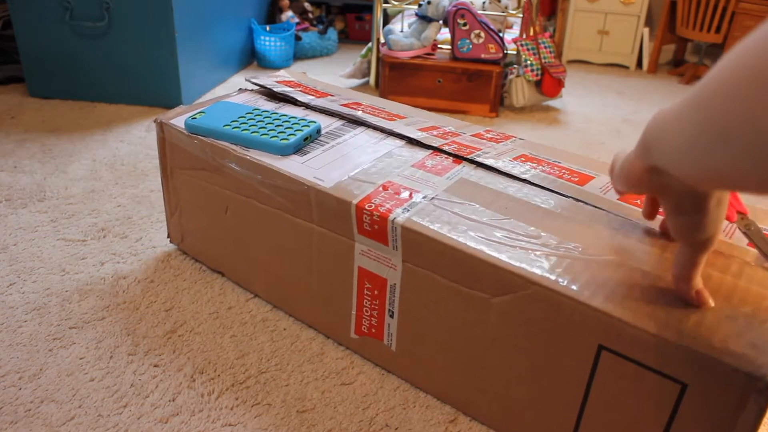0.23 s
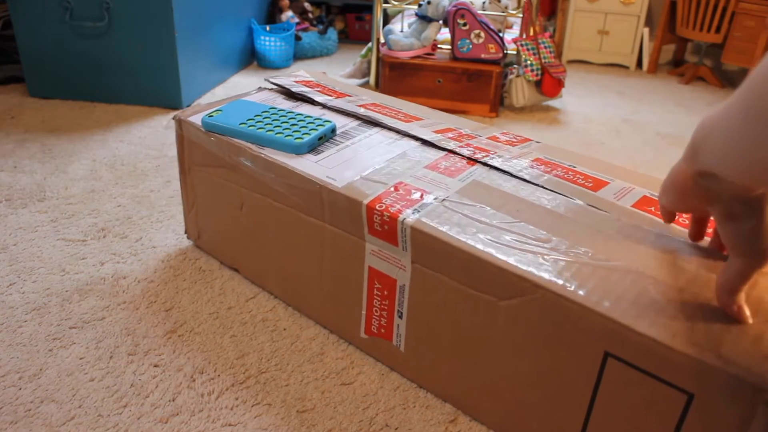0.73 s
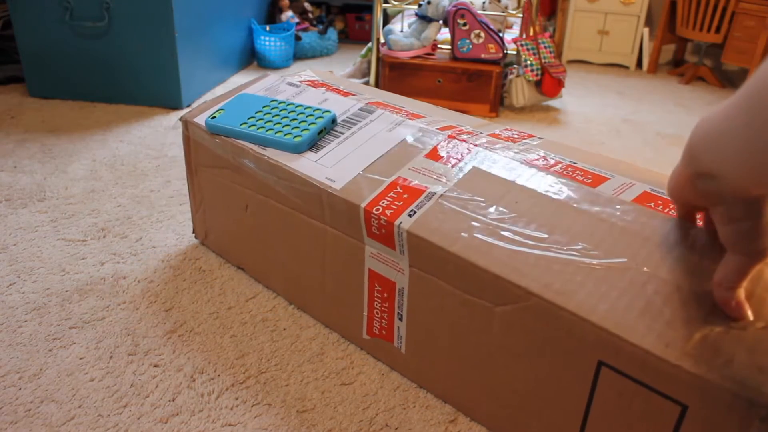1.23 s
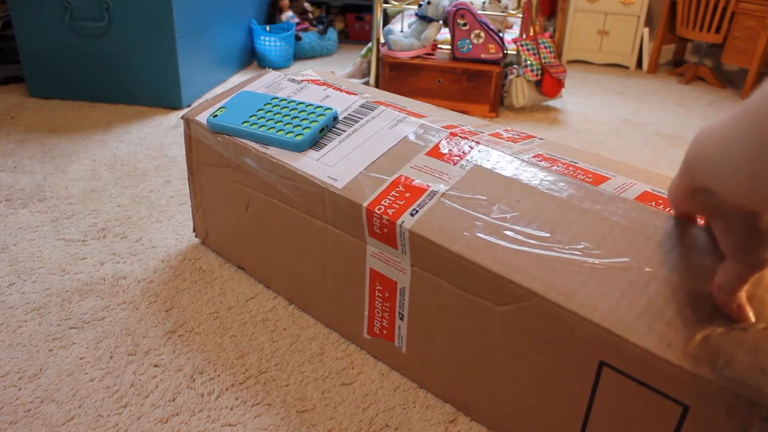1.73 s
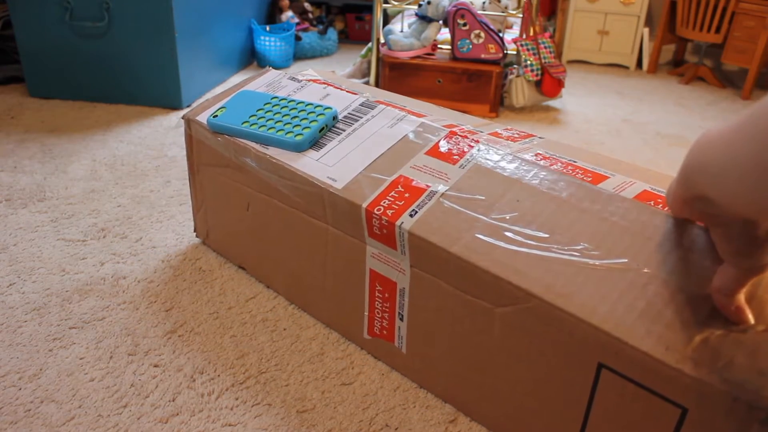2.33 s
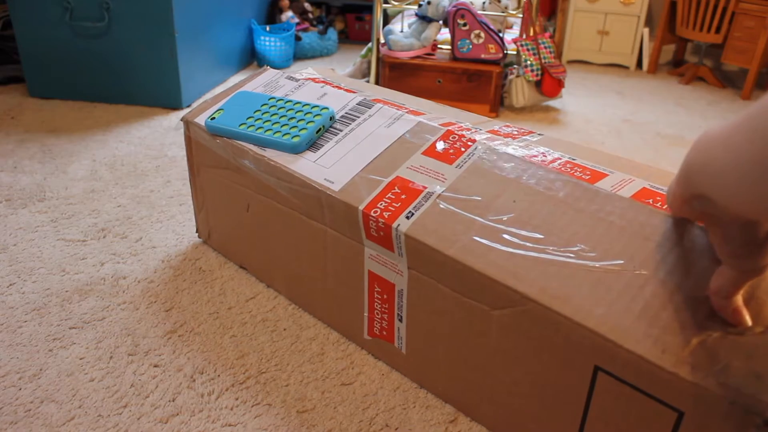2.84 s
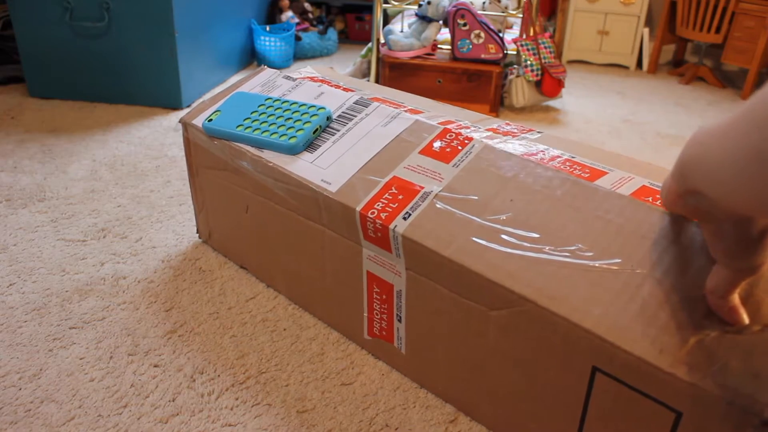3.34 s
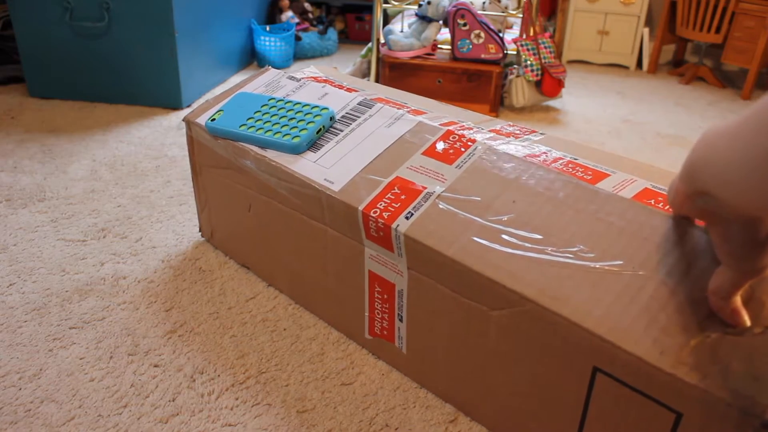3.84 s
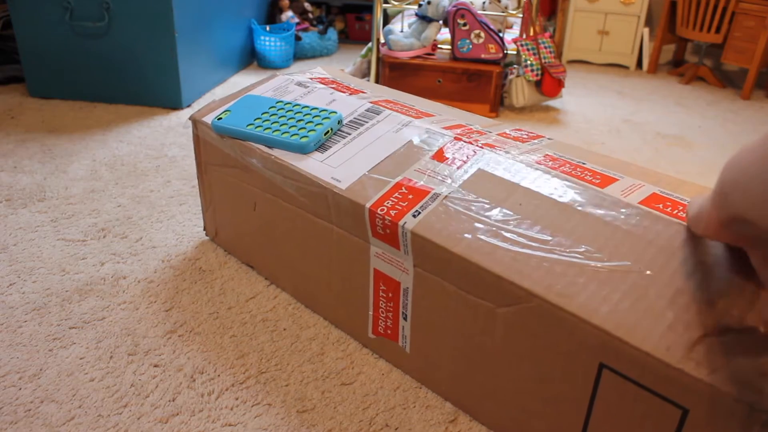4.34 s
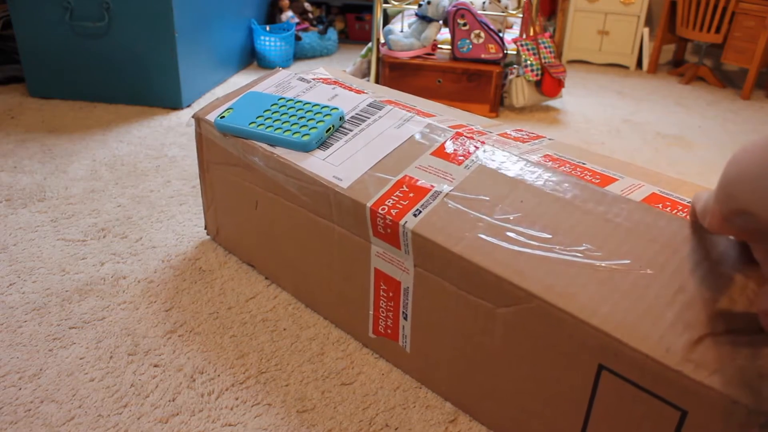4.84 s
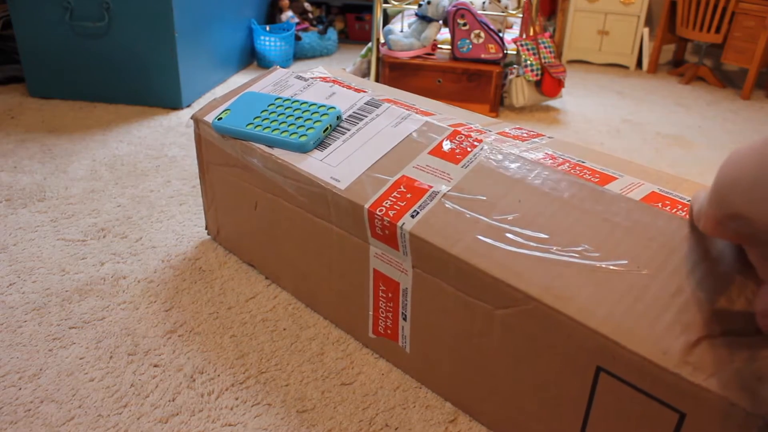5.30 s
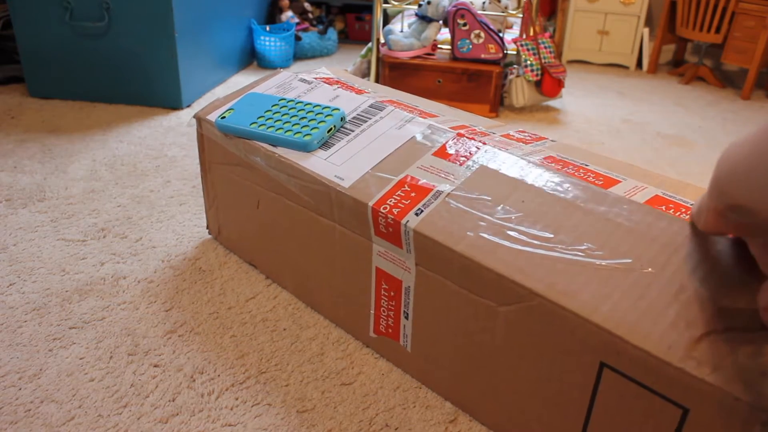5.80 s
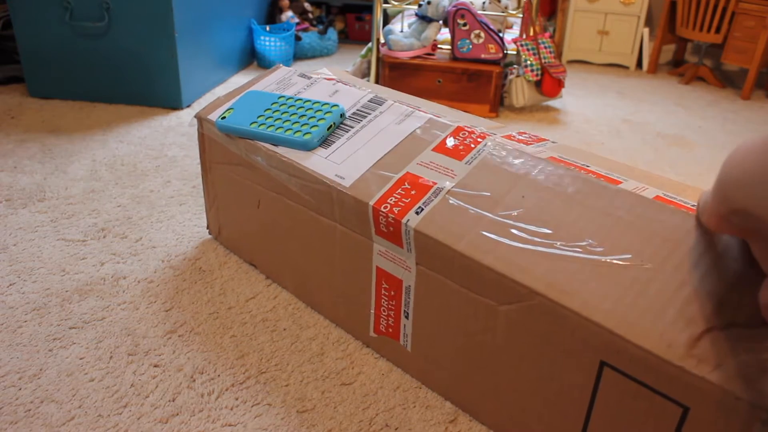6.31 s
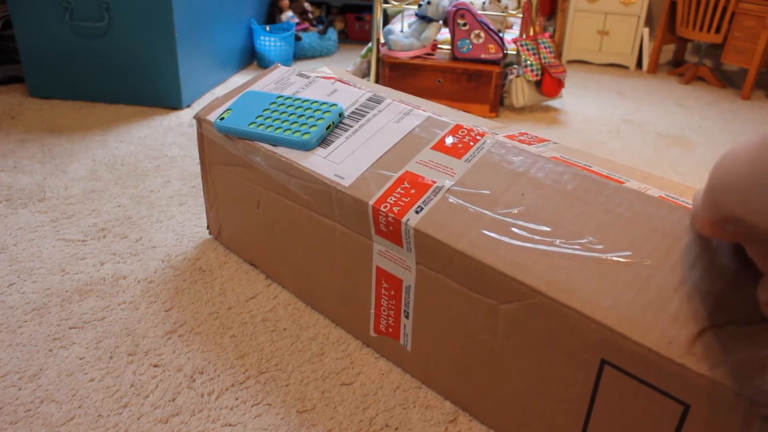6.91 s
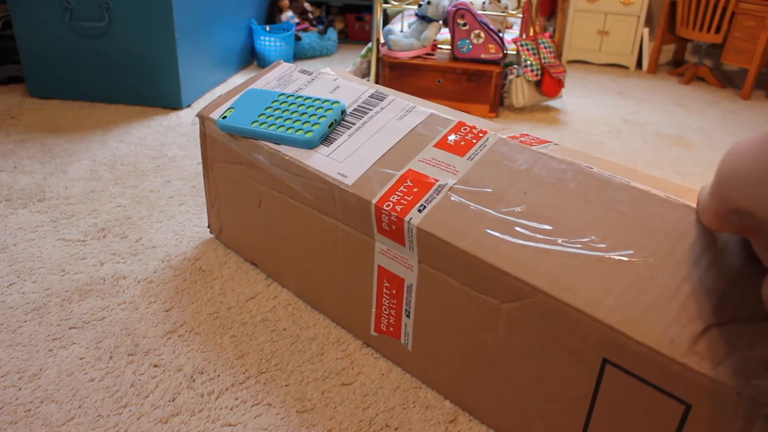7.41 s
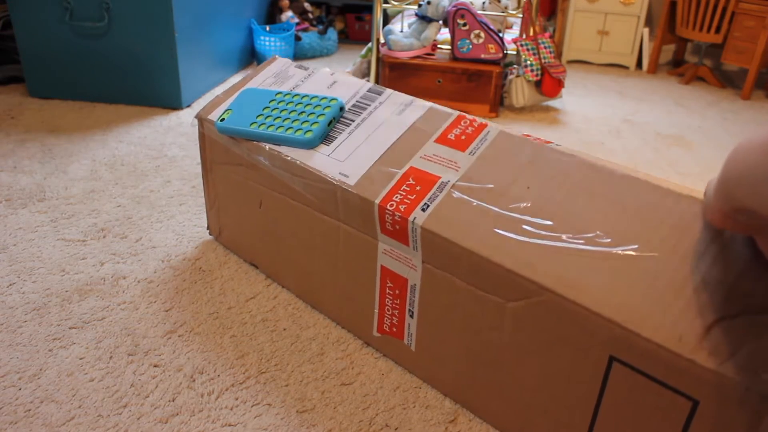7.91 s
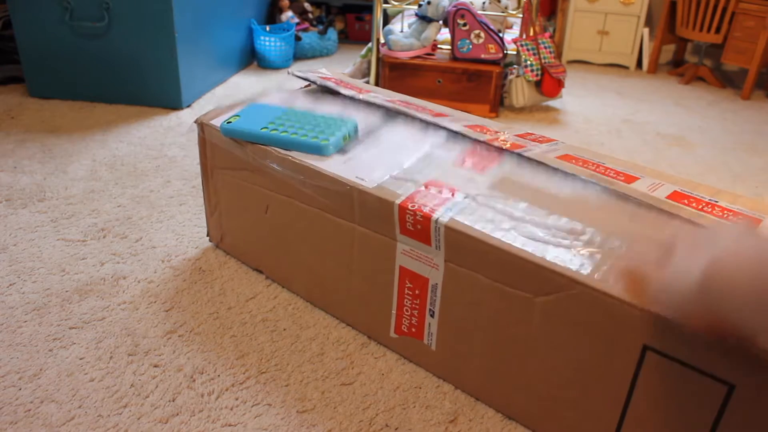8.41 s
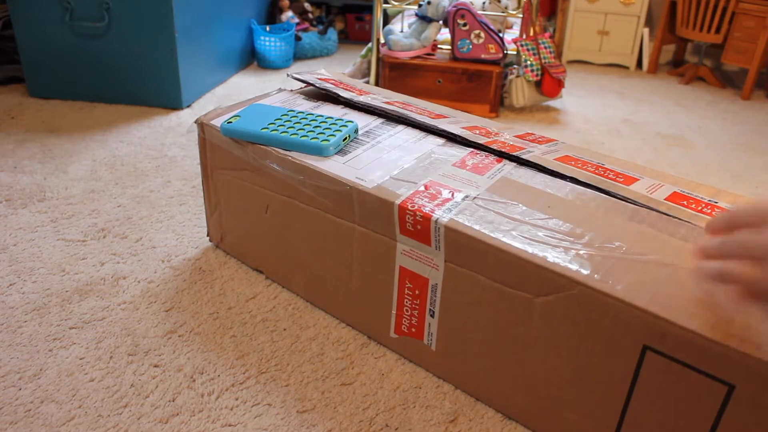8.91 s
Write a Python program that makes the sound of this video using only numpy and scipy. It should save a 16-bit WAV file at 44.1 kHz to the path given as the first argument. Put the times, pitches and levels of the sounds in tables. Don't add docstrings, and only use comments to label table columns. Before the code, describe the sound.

Hands work at a taped cardboard box close to a small microphone in a quiet carpeted room. Loud tape snaps, crinkles and hollow knocks crowd the first second or so, then softer rubbing, low thumps and little creaks follow with pauses. Tape crackles pick up again later, ending in scraping flaps and quieter handling. Faint hiss, hum and a distant bird lie behind.

```python
import sys
import numpy as np
from scipy import signal
from scipy.fft import rfft, irfft, next_fast_len
from scipy.io import wavfile
from scipy.ndimage import uniform_filter1d

SR = 44100
rng = np.random.default_rng(int(sys.argv[2]) if len(sys.argv) > 2 else 0)


def volts(x):
    e = np.asarray(x, float) / 20
    return 10 ** e


def wav_out(sig):
    wavfile.write(sys.argv[1], SR, np.round(np.clip(np.atleast_2d(sig).T, -1, 1) * 32767).astype(np.int16))


N = 403515

# (frequency [Hz], width [Hz], gain [dB])
BOX = [(225, 58, 2.5), (428, 261, 0.5), (559.6, 190, 3.5), (771, 348, -3), (1100, 610, -10)]
# (frequency [Hz], width [Hz], gain [dB])
FLAP = [(987, 310, 2.5), (1364, 440, 5), (1816, 530, 4.5), (2416, 356, 1.5), (2970, 560, -8)]
# (frequency [Hz], width [Hz], gain [dB])
SWAY = [(85, 38, -1), (123, 75, 1.5), (179, 58, 1.5)]


def evened(x):
    return x / np.sqrt(np.mean(x ** 2) + 1e-20)


def read(points, hz):
    f, value = np.transpose(points)
    return np.interp(np.log(hz + 1), np.log(f + 1), value)


def add(mix, s, sound):
    part = mix[round(s * SR):][:len(sound)]
    part += sound[:len(part)]


def colour(x, points):
    size = next_fast_len(len(x))
    gain = volts(read(points, np.fft.rfftfreq(size, 1 / SR)))
    return irfft(rfft(x, size) * gain, size)[:len(x)]


def ring(x, modes):
    out = np.zeros(len(x))
    for k, (hz, width, db) in enumerate(modes):
        b, a = signal.iirpeak(hz, hz / min(width, SR / 5), SR)
        out += (-1) ** k * volts(db) * signal.lfilter(b, a, x)
    return out


def slips(per_s, spread_db, clump_db, clump_s, smooth):
    drift = uniform_filter1d(rng.standard_normal(N), max(int(clump_s * SR), 2))
    clumps = volts(clump_db * evened(drift))
    when, size, noise = rng.random(N), rng.exponential(1, N), rng.standard_normal((2, N))
    grains = (when < per_s / SR) * volts(spread_db * np.minimum(size, 3.6)) * np.sign(noise[0])
    return clumps * (evened(grains) + smooth * noise[1])


def quiet():
    # (frequency [Hz], level [dB per Hz])
    hiss_spectrum = [(18, -36), (30, -6), (65, -1.5), (112, -2.5), (167, -9), (378, -13.5), (420, -17),
                     (1380, -27), (2600, -19.5), (3130, -26), (3480, -23), (15800, -29.5), (16100, -58)]
    hiss_db = -58.5
    hum_hz, hum_db = 118.4, -70
    hum = np.sqrt(2) * volts(hum_db) * np.sin(2 * np.pi * hum_hz * np.arange(N) / SR)
    return volts(hiss_db) * evened(colour(rng.standard_normal(N), hiss_spectrum)) + hum


def bird():
    # (time [s], length [s], start pitch [Hz], end pitch [Hz], level [dB])
    bird_notes = [
        (1.355, 0.1, 2680, 2620, -70.5),
        (1.495, 0.059, 2660, 2660, -65),
        (2.755, 0.097, 2680, 2640, -61),
        (4.43, 0.066, 2660, 2620, -61),
        (5.32, 0.063, 2680, 2660, -62),
        (6.06, .11, 2680, 2650, -64),
        (6.175, 0.056, 2690, 2660, -61),
        (8.763, 0.067, 3240, 2900, -65),
    ]
    out = np.zeros(N)
    for s, length, start_hz, end_hz, db in bird_notes:
        hz = np.linspace(start_hz, end_hz, int(length * SR))
        hz = hz + 18 * evened(uniform_filter1d(rng.standard_normal(len(hz)), size=150))
        whistle = np.sin(2 * np.pi * np.cumsum(hz) / SR)
        add(out, s, 2 * volts(db) * whistle * np.hanning(len(hz)) ** 0.82)
    return out


def room(x):
    # (frequency [Hz], time to fall 60 dB [s])
    decay_times = [(150, 0.17), (500, 0.21), (2500, 0.22), (9000, 0.17)]
    taps = np.zeros(SR // 2)
    at = np.arange(160, SR // 2 - 20, 20)
    taps[at + rng.integers(0, 20, len(at))] = rng.choice([-1., 1.], len(at))
    hz, t, z = signal.stft(taps, SR, nperseg=256)
    fall = volts(-60 * t / read(decay_times, hz)[:, None])
    tail = signal.istft(z * fall, SR, nperseg=256)[1]
    return signal.fftconvolve(x, tail / np.linalg.norm(tail))[:N]


def heaves():
    # (time [s], length [s], level [dB])
    leans = [(0.364, 0.076, -38), (0.573, 0.059, -53), (0.69, 0.027, -51), (0.76, 0.14, -52),
             (0.923, 0.067, -47), (1.049, 0.039, -37), (1.093, 0.043, -42), (1.483, 0.035, -42.5),
             (1.7, 0.11, -38), (2.048, 0.047, -43), (2.18, 0.027, -44), (2.43, 0.16, -38.5),
             (3.083, 0.041, -42), (3.125, 0.059, -38), (3.2, 0.032, -44), (3.484, 0.094, -38.5),
             (4.03, 0.031, -41), (4.573, 0.059, -51), (4.777, 0.11, -39), (4.943, 0.064, -47),
             (5.176, 0.029, -44), (5.224, 0.047, -37), (5.345, 0.076, -47), (5.613, 0.056, -47),
             (5.694, 0.097, -40.5), (5.825, 0.073, -49), (5.946, 0.12, -42), (6.254, 0.047, -45),
             (6.946, 0.05, -53), (7.064, 0.046, -40), (7.134, 0.15, -38), (7.574, 0.085, -41),
             (7.637, 0.087, -39), (8.238, 0.031, -55), (8.334, 0.052, -34), (8.442, 0.039, -48),
             (8.987, 0.027, -52), (9.102, 0.067, -41)]
    out = np.zeros(N)
    sway = ring(ring(rng.standard_normal(N + SR), SWAY), [(127, 180, 0)])
    for s, length, db in leans:
        u = np.arange(0, 1.1 * length, 1 / SR) / (1.1 * length)
        swell = np.sin(np.pi * u ** 0.67) ** 1.6
        add(out, s, volts(db - 4.8) * evened(swell * sway[round(s * SR):][:len(u)]))
    return out


def knocks():
    # (time [s], peak level [dB])
    lid_taps = [(0.0543, -21), (.098, -26), (0.2237, -28), (0.3225, -25.5), (0.3929, 1), (0.563, -19.5),
                (0.659, -21.5), (0.7583, -25), (0.7744, -17), (.828, -6), (0.929, -17), (0.9633, -18.5),
                (0.9779, -18.5), (1.055, -35), (1.107, -25.5), (1.174, -36), (1.222, -39), (2.055, -33.5),
                (2.131, -36), (2.405, -45), (2.792, -42), (4.0351, -22.5), (4.171, -27.5), (5.508, -27),
                (5.7608, -18.5), (6.0352, -24), (6.595, -33.5), (7.273, -17), (8.2435, -22), (8.999, -27)]
    # (time [s], peak level [dB], panel pitch [Hz])
    wall_pushes = [(0.4008, -11.5, 248), (0.6211, -19.5, 275), (2.956, -23, 388), (3.1476, -27, 248),
                   (3.2922, -28.5, 330), (3.5203, -21.5, 226), (1.49, -34, 200), (4.564, -38, 302),
                   (4.837, -23.5, 230), (5.236, -29, 200), (5.6, -35, 276), (5.624, -28, 250),
                   (8.45, -31, 274), (9.034, -31, 370), (4.617, -27, 330), (4.943, -33, 177),
                   (5.3598, -30.5, 266), (5.725, -18, 285), (5.739, -18.5, 250), (5.8523, -23, 357),
                   (5.86, -22, 330), (5.9742, -19.5, 281), (6.2536, -25.5, 272), (6.367, -32.5, 280),
                   (6.964, -22.5, 245), (7.0837, -21.5, 265), (7.238, -17.5, 318), (7.584, -27, 231),
                   (7.6032, -23.5, 362), (7.6718, -20.5, 233), (8.2343, -20.5, 349), (8.362, -21.5, 206)]
    lid_hz = 479
    out, t = np.zeros(N), np.arange(4000) / SR
    rows = [r + (lid_hz,) for r in lid_taps] + wall_pushes
    for (s, db, hz), noise in zip(rows, rng.standard_normal((len(rows), 4000))):
        panel = np.sin(2 * np.pi * hz * t) * np.exp(-t * hz / 0.86)
        push = noise * np.exp(-t / 0.0023)
        hollow = ring(ring(push, [(330, 3500, 0)]), BOX)
        sound = ring(panel, [(hz, 3.3 * hz, 3)]) / abs(panel).max() + 0.78 * hollow / abs(hollow).max()
        add(out, s, volts(db - 0.5) * sound / abs(sound).max())
    return out


def rubs():
    # (time [s], length [s], pitch [Hz], level [dB])
    rubbed_patches = [(0.0, 0.037, 2320, -51), (.225, 0.041, 9500, -46), (1.758, 0.051, 1000, -49),
                      (3.46, 0.067, 2090, -51), (3.461, 0.035, 1300, -53), (4.37, 0.2, 2150, -60),
                      (4.617, .04, 3700, -58), (4.947, 0.058, 5170, -58), (5.189, .085, 8400, -55),
                      (5.19, .085, 6000, -56), (5.191, 0.081, 3700, -54.5), (2.02, .07, 1700, -51.5),
                      (3.603, .05, 1490, -55), (0.781, 0.038, 3970, -44), (5.349, 0.042, 5300, -56),
                      (5.505, 0.022, 3650, -47.5), (5.68, 0.032, 4000, -56), (5.723, .05, 5300, -52.5),
                      (5.977, 0.045, 3630, -50), (6.247, 0.04, 1670, -49), (6.273, 0.12, 2970, -52.5),
                      (6.65, 0.035, 2900, -54), (6.698, .05, 3200, -45), (0.964, 0.057, 3000, -38),
                      (1.301, 0.084, 563, -51), (4.257, 0.13, 300, -58), (6.353, 0.053, 269, -44.5),
                      (9.004, 0.037, 1500, -53), (7.146, .03, 5000, -39), (7.261, 0.03, 7000, -36.5),
                      (7.258, 0.046, 11700, -37), (8.539, 0.045, 4760, -61)]
    out, grit = np.zeros(N), slips(2500, 2.5, 3.4, 0.01, 0.31)
    for s, length, hz, db in rubbed_patches:
        part = grit[round(s * SR):][:int(length * SR)]
        band = [(hz, 0.16 * hz, 0)]
        song = ring(ring(part, band), band)
        add(out, s, volts(db) * evened(song * np.hanning(len(part)) ** 0.6))
    return out


def pops():
    # (time [s], peak level [dB], pitch [Hz])
    crease_pops = [(0.206, -39, 6000), (.371, -26, 11500), (.419, -25, 3700), (.448, -29, 11000),
                   (2.13, -36, 1500), (3.40, -40, 1810), (3.415, -44, 1800), (3.871, -40, 1900),
                   (4.15, -41, 1500), (4.135, -31, 1100), (4.51, -40, 1200), (4.7, -42, 1510),
                   (4.833, -35, 2210), (3.983, -42, 700), (3.7785, -49.5, 3720), (3.8093, -35.5, 3600),
                   (3.824, -42, 3500), (4.289, -37, 4500), (4.93, -34, 1700), (5.157, -44, 5000),
                   (5.175, -40, 5000), (5.312, -43, 5000), (5.538, -34, 2200), (5.555, -41, 9000),
                   (5.673, -35, 3500), (5.891, -31, 3600), (6.007, -35, 5200), (6.029, -25, 5000),
                   (6.573, -37, 9500), (7.558, -34, 11000), (7.572, -39, 8000), (7.892, -43, 6900),
                   (7.919, -40, 3500), (4.674, -31, 5900), (7.666, -20, 8400), (5.633, -30, 3300),
                   (1.331, -31.5, 3030), (2.572, -35, 1700)]
    out, t = np.zeros(N), np.arange(900) / SR
    for (s, db, hz), noise in zip(crease_pops, rng.standard_normal((len(crease_pops), 900))):
        band = [(hz, 0.5 * hz, 0)]
        tick = (t == 0) + 0.13 * noise * np.exp(-t / .003)
        pop = ring(ring(tick, band), band)
        add(out, s, volts(db) * pop / abs(pop).max())
    return out


def rumble():
    contact = ring(slips(600, 1.5, 2.94, 0.017, 0.83), [(402, 720, 0)])
    rocking = ring(slips(100, 1.7, 9.0, 0.025, 0.73), SWAY)
    return evened(ring(contact, BOX)) + volts(-6.0) * evened(rocking)


def creases(low_hz, high_hz, width, count=6):
    out = np.zeros(N)
    for hz in np.geomspace(low_hz, high_hz, count):
        out += ring(slips(500, 2.15, 3.6, .025, 0.75), [(hz, width * hz, 0)]) / np.sqrt(hz)
    return out


def crackle(count=6):
    out = np.zeros(N)
    for hz in np.geomspace(1100, 8000, count):
        ticks = (rng.random(N) < 45 / SR) * volts(3.5 * np.minimum(rng.exponential(1, N), 4))
        out += evened(ring(ticks, [(hz, 0.15 * hz, 0)]))
    return evened(out)


def contact_layers():
    # (frequency [Hz], level [dB per Hz])
    film_spectrum = [(1470, -20.5), (2500, -0.5), (3430, -4), (4890, -3.5), (5550, -4), (12000, -4),
                     (15800, -6), (16100, -40)]
    judder = volts(2.0 * evened(uniform_filter1d(rng.standard_normal(N), 500)))
    low = rumble()
    scrape = evened(judder * ring(creases(800, 3000, 0.88), FLAP))
    crinkle = evened(judder * colour(creases(3000, 15000, 0.59), film_spectrum))
    return low, scrape, crinkle + volts(-10) * crackle()


def grip(low, scrape, crinkle):
    # (time [s], effort [dB], share of tape under the fingers [dB])
    hand_course = [(0.0, -41, -10), (0.3, -55, 6), (0.84, -49.5, -9), (1.3, -54.5, -1.5),
                   (2.93, -58.5, -2.5), (3.31, -50, 0), (3.87, -60.5, 0.5), (4.05, -46.5, -1.5),
                   (4.56, -47.5, -3.5), (5.22, -68, 8.5), (5.63, -43.5, -5), (6.039, -56.5, 2),
                   (6.499, -58, 1.5), (7.11, -54.5, 1.5), (7.95, -58, 3.5), (8.33, -38.5, -3),
                   (8.538, -59.5, -0.5), (9.098, -59, -5)]
    s, *courses = np.transpose(hand_course)
    effort_db, tape_db = (np.interp(np.arange(N) / SR, s, db) for db in courses)
    scrape_db = -3.2 + 0.69 * tape_db
    return volts(effort_db - 4.5) * (low + volts(scrape_db) * scrape + volts(tape_db) * crinkle)


def strokes(low, scrape, crinkle):
    # (time [s], length [s], rumble [dB], crinkle over rumble [dB])
    shove_strokes = [(0., 0.0075, -33, -23), (.056, 0.019, -39.5, -6.5), (.386, 0.013, -19.5, -9),
                     (.41, 0.015, -35, -19.5), (.558, 0.063, -35.5, -6), (.819, 0.062, -36, -1.5),
                     (1.47, 0.024, -48, -8), (1.738, .085, -43, -8.5), (2.015, 0.096, -40, -13),
                     (2.118, 0.026, -44.5, -10), (2.442, 0.067, -32.5, -7), (2.938, 0.055, -47, -23),
                     (3.075, 0.1, -30.5, -11.5), (3.279, 0.014, -53, 1), (3.591, 0.055, -40, -10),
                     (4.023, 0.023, -32.5, -9.5), (4.53, 0.037, -41.5, -18), (4.77, 0.083, -38, -12),
                     (4.915, 0.087, -41, -15.5), (5.046, 0.036, -48.5, -34), (5.723, 0.042, -27.5, -12.5),
                     (5.837, 0.043, -46.5, 5.5), (6.412, 0.073, -47, -11.5), (6.786, 0.077, -39.5, -9),
                     (6.947, 0.04, -33.5, -12), (7.18, 0.048, -33, -18), (9.11, 0.043, -40, -10)]
    # (time [s], length [s], rumble [dB], crinkle over rumble [dB])
    slide_strokes = [(.653, 0.073, -42, 1), (.99, 0.073, -48, 4), (2.18, 0.031, -47.5, -3.5),
                     (2.239, 0.024, -50.5, -0.5), (2.554, 0.06, -42, -3), (2.656, 0.051, -56, 7.5),
                     (2.841, 0.063, -64.5, 7.5), (3.19, 0.036, -49, 0), (3.45, 0.082, -45, -1),
                     (4.111, 0.068, -49.5, 4.5), (4.617, 0.024, -50.5, 0), (5.409, 0.019, -47, 0.5),
                     (6.252, 0.1, -40.5, -7), (7.078, 0.061, -49, 8), (7.908, 0.1, -45.5, -9.5),
                     (8.102, 0.038, -43, -8.5), (8.236, 0.013, -39, 4), (8.338, 0.067, -42.5, -3.5),
                     (8.999, 0.053, -39.5, -3.5)]
    # (time [s], length [s], rumble [dB], crinkle over rumble [dB])
    tug_strokes = [(.219, 0.05, -49, -12), (.313, 0.11, -47, 2.5), (.759, 0.031, -34.5, 1.5),
                   (.917, 0.06, -32, 2), (1.11, 0.012, -37.5, 2.5), (1.244, 0.034, -48, -9),
                   (1.315, .03, -46, 0), (1.578, .064, -50, -5), (3.842, 0.13, -45, -2.5),
                   (5.19, 0.076, -41, -0.5), (5.352, 0.026, -43.5, -4.5), (5.502, 0.032, -58, 10),
                   (5.62, 0.096, -43.5, -2.5), (5.986, 0.069, -36.5, 1), (6.586, 0.091, -62.5, 12),
                   (6.675, 0.053, -38.5, 1.5), (7.134, 0.026, -38, 8.5), (7.224, 0.076, -29, -1),
                   (7.435, 0.08, -38, -1.5), (7.582, 0.089, -42, 2), (7.661, 0.061, -36, -2.5),
                   (8.42, 0.071, -44.5, 2)]
    shove, slide, tug = (-1.7, 0.64, 2200), (-3, 0.86, 1600), (-5, 0.46, 7000)
    patch_spread = 0.22
    lead, tail = .02, .12
    kinds = ((shove_strokes, shove), (slide_strokes, slide), (tug_strokes, tug))
    moves = [row + kind for rows, kind in kinds for row in rows]
    out = np.zeros(N)
    for move, chance in zip(moves, rng.uniform(-1.2, 1, len(moves))):
        s, length, rumble_db, crinkle_db, base_db, follow, hz = move
        scrape_db = base_db + follow * crinkle_db
        hz = hz * (1 + patch_spread * chance)
        t = np.arange(-min(lead, s), length + tail, 1 / SR)
        swell = volts(np.interp(t, [-lead, 0, .005, 0.47 * length, length, length + tail],
                              [-31.5, -10.5, -4.0, 0, -5, -63.5]))
        first = round((s + t[0]) * SR)
        part = slice(first, first + len(t))
        swell = swell[:len(low[part])]
        box, board, film = (x[part] / np.sqrt(np.average(x[part] ** 2, weights=swell ** 2))
                            for x in (low, scrape, crinkle))
        bright = volts(scrape_db) * board + volts(crinkle_db) * film
        patch = ring(bright, [(hz, 0.038 * hz, 0)])
        out[part] += volts(rumble_db - 1.27) * swell * (box + bright + 1.3 * patch)
    return out


def handling():
    layers = contact_layers()
    return grip(*layers) + strokes(*layers)


def snaps():
    # (time [s], peak level [dB], film ring [Hz])
    film_snaps = [(0.2232, -8, 10400), (.364, -27, 6020), (0.393, -5, 7200), (0.6615, -22, 7700),
                  (0.7597, -8.5, 6900), (.9169, -23, 4180), (.9822, -22, 4300), (2.2395, -35, 5660),
                  (3.359, -34, 6660), (4.673, -38, 6000), (6.247, -30, 5070), (6.29, -40, 5300),
                  (6.6891, -20, 6680), (6.6984, -23, 6700), (6.7043, -15, 6700), (7.1003, -28, 9680),
                  (7.142, -17, 6360), (7.2364, -19.5, 12490), (7.403, -21, 9000), (7.4105, -28, 7830),
                  (7.5502, -32, 6660), (7.5846, -25, 8500), (8.3293, -15, 2600), (8.013, -36, 4000),
                  (8.434, -24, 7000), (8.471, -36, 5000), (8.5455, -36, 4560)]
    # (time [s], peak level [dB], film ring [Hz])
    glue_snaps = [(.3744, -23, 7740), (0.4017, -2, 3620), (.619, -41, 4470), (0.6826, -22, 3880),
                  (.774, -4, 3900), (0.854, -12.5, 3000), (0.9613, -10, 2460), (1.109, -14, 8200),
                  (1.115, -14, 3150), (1.343, -33, 13100), (1.894, -35, 7450), (3.046, -35, 5400),
                  (5.5155, -33, 3580), (5.5715, -28.5, 3580), (5.6426, -23.5, 4800), (5.817, -29, 7600),
                  (5.8575, -19.5, 6800), (6.032, -18, 7600), (6.37, -31, 6500), (7.276, -8, 11600),
                  (7.6017, -17, 8600), (8.2352, -11.5, 4100), (8.243, -15, 12700), (8.334, -21, 2560),
                  (8.391, -19.5, 4000), (9.134, -26.5, 12700)]
    # (time [s], peak level [dB], film ring [Hz], flap ring over the snap [dB])
    flap_flicks = [(0.0532, -33.5, 2620, 11.5), (0.324, -28, 6440, 0), (0.3933, -14, 2450, 12),
                   (0.5624, -18, 1900, 1.5), (0.604, -42, 2000, 18), (0.8287, -11.5, 5900, 5),
                   (0.9274, -13, 2090, 4.5), (0.9758, -7.5, 3120, -5.5), (1.1116, -16, 9300, -5),
                   (1.1193, -17, 4730, -6), (1.4825, -29.5, 4300, -3.5), (1.8132, -33, 2300, 4),
                   (1.8645, -37, 6940, -7), (2.445, -38, 2770, 13), (3.0772, -41.5, 2500, 14.5),
                   (4.031, -18.5, 2540, 4), (4.6175, -40.5, 3660, 7), (4.9492, -41, 2000, 11),
                   (5.7258, -30, 2800, 3.5), (5.973, -25, 8300, -1), (5.9932, -23, 6240, -11),
                   (6.195, -47.5, 2500, 9), (6.256, -36.5, 3190, 7), (6.5927, -42.5, 2500, 15),
                   (7.762, -27, 3500, -1), (7.948, -35.5, 2500, 10.5), (8.1948, -25, 2500, -17),
                   (8.9988, -26.5, 5200, 2.5)]
    # (time [s], peak level [dB], film ring [Hz], flap ring over the snap [dB])
    double_snap = [
        (.9374, -6, 7400, -22),
        (.9417, -1, 5200, -19),
    ]
    film_flap_db, glue_flap_db = -18, -9.5
    rows = [r + (film_flap_db,) for r in film_snaps] + [r + (glue_flap_db,) for r in glue_snaps]
    rows = rows + flap_flicks + double_snap
    out, t = np.zeros(N), np.arange(2600) / SR
    for (s, db, hz, flap_db), noise in zip(rows, rng.standard_normal((len(rows), 2600))):
        tick = np.sign(noise) * np.exp(-t / 0.00037)
        fizz = noise * np.exp(-t / 0.0019)
        burst = tick + volts(-14.5) * fizz
        film = ring(burst, [(hz, 2000, 0), (6500, 7000, -9), (10000, 4000, -11)])
        film = film + 0.5 * np.roll(film, 8 + int(25 * abs(noise[-1])))
        flap = ring(ring(burst, [(1700, 2300, 0)]), FLAP)
        add(out, s, volts(db) * (film / abs(film).max() + volts(flap_db) * flap / abs(flap).max()))
    return out


def scene():
    box = handling() + snaps() + knocks() + heaves() + rubs() + pops()
    return (box + volts(-11.0) * room(box) + bird() + quiet())[None]


def roll_off(x):
    return signal.sosfilt(signal.butter(12, 16800, fs=SR, output="sos"), x)


def record(dry):
    thin = signal.sosfilt(signal.butter(2, 70, "high", fs=SR, output="sos"), dry)
    overloaded = np.clip(thin, -1, 1)
    edge = .95 * signal.firwin(511, 15850, fs=SR) + .05 * signal.firwin(511, 16700, fs=SR)
    return roll_off(signal.oaconvolve(overloaded, edge[None], "same"))


dry = scene()
out = record(dry)
wav_out(out)
```